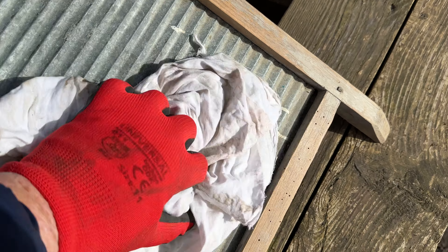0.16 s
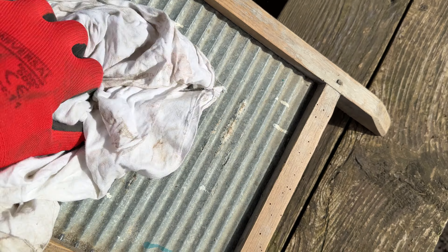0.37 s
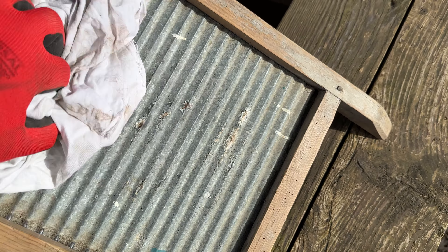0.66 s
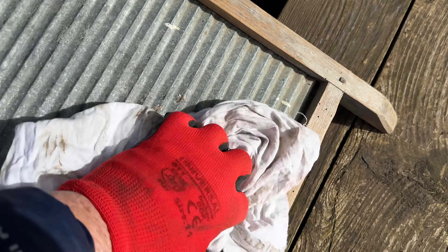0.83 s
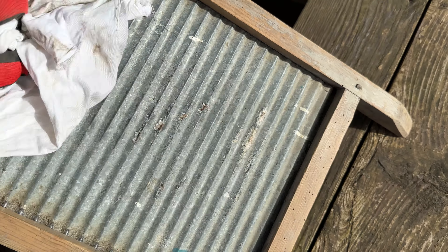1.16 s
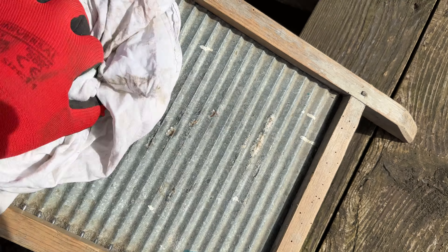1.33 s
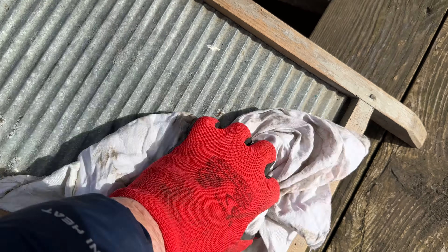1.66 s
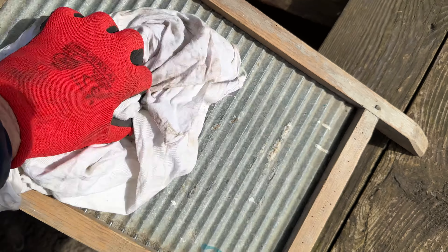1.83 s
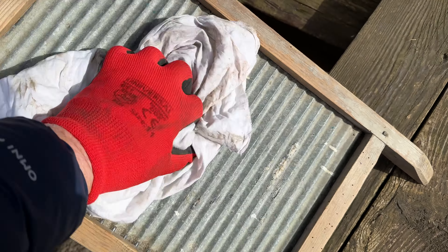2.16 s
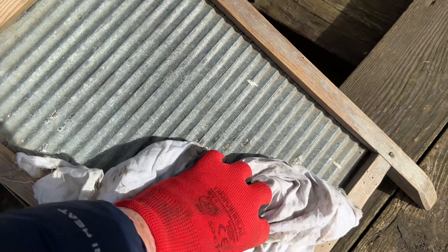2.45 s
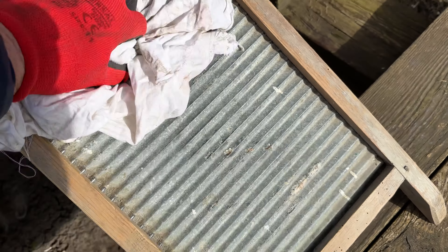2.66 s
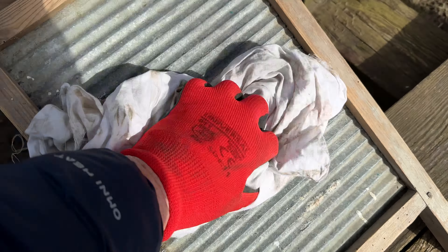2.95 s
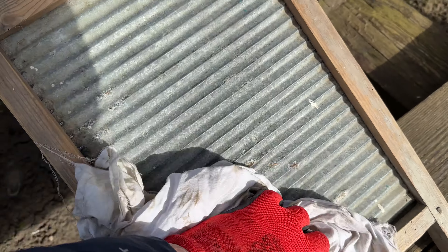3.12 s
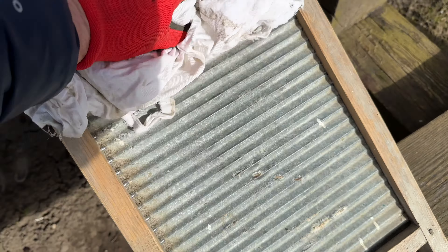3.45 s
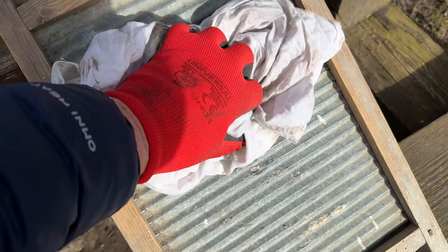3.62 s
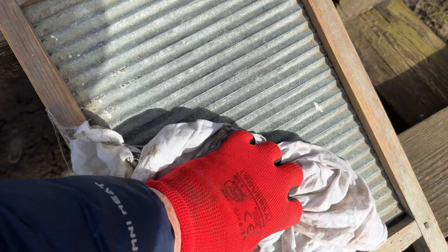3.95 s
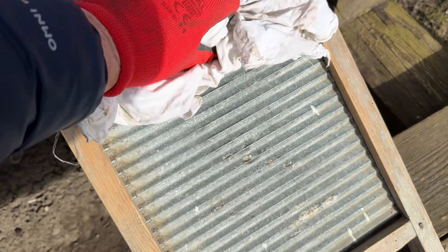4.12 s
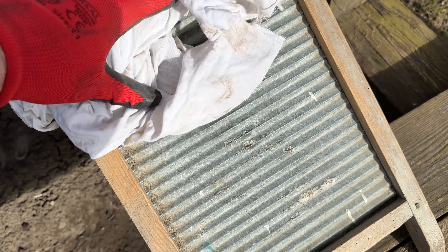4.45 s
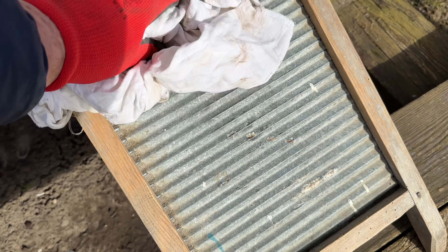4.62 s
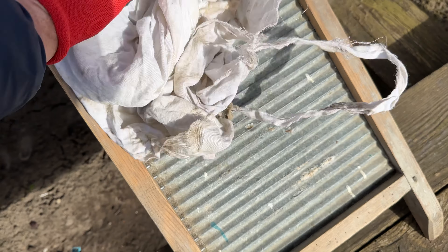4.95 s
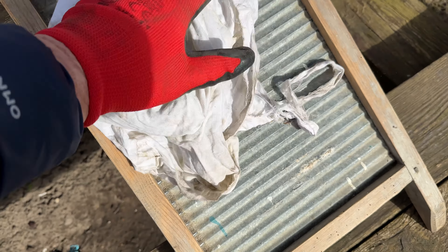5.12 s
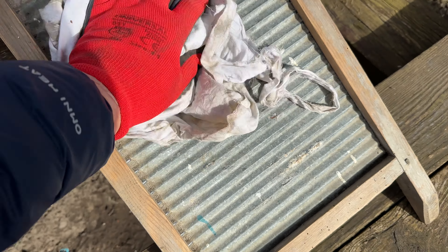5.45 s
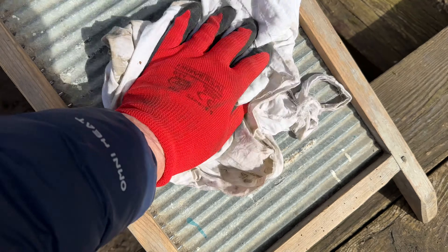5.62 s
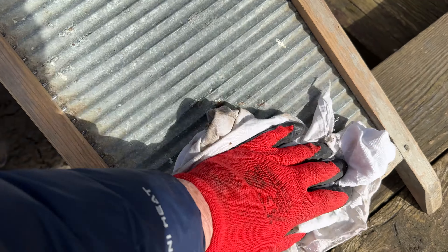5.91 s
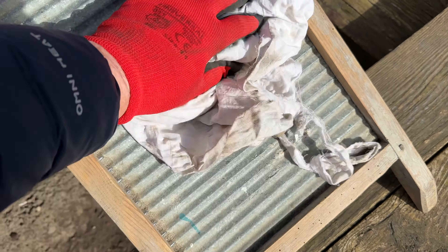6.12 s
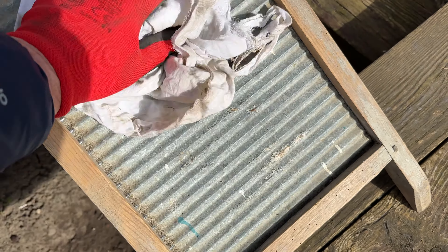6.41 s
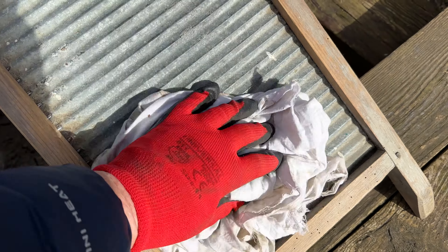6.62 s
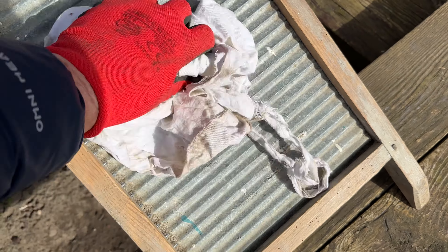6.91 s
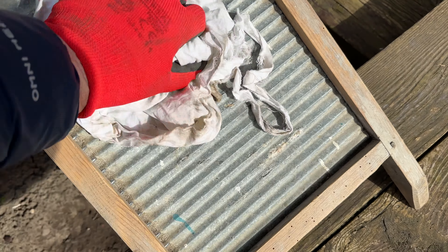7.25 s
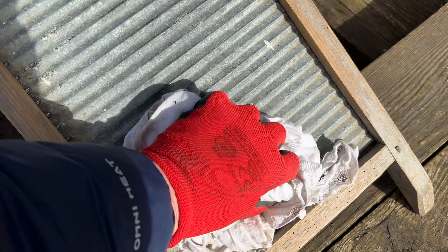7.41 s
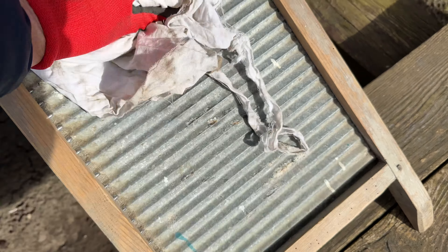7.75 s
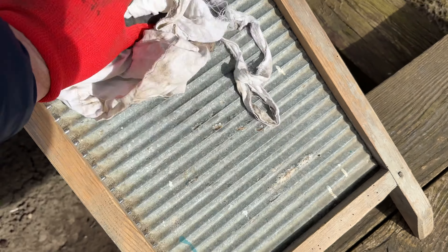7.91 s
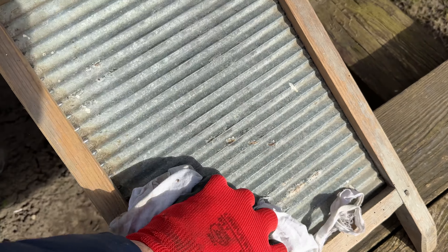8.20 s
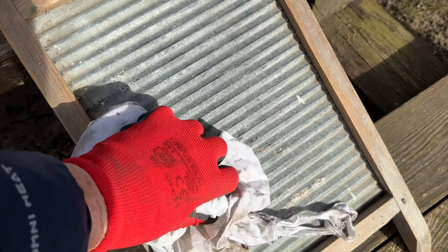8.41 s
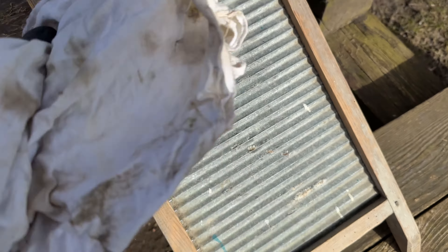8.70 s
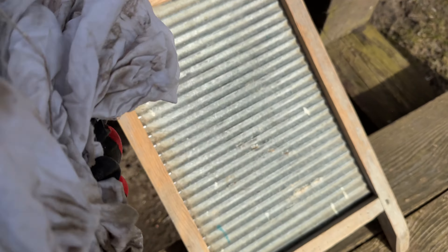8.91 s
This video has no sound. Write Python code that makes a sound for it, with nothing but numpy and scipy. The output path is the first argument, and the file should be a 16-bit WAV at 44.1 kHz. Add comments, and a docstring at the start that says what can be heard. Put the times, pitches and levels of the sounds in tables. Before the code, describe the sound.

Close outdoors, a cloth is rubbed back and forth across a corrugated metal washboard in a wooden frame. Quick strokes make a gritty, ridged hiss over hollow metallic ringing and low wooden rumble, with rattling surges at some turns. After four seconds the cloth is lifted and rustles, the board drops with a clack, then scrubbing resumes more forcefully until it stops near the end.

```python
"""Washboard scrubbed on a deck

Outdoors, close to the microphone: a gloved hand scrubs a bunched cloth up and down a corrugated metal
washboard that leans on a wooden deck. Each stroke speeds up and slows to a turn: noise pulsed ridge by ridge
makes the fibre hiss, and the same jolts drive the resonances of the sheet and its frame.
The board roars in surges, and runs of noise bursts make the loose sheet clatter.
Halfway the cloth is lifted and gripped anew while the board drops back on its support."""
import sys
import numpy as np
from scipy import signal
from scipy.fft import rfft, irfft, next_fast_len
from scipy.io import wavfile
from scipy.ndimage import uniform_filter1d

SR = 44100
rng = np.random.default_rng(int(sys.argv[2]) if len(sys.argv) > 2 else 0)


def pcm_store(signal):
    """Save signal as 16-bit PCM."""
    levels = np.round(np.clip(np.atleast_2d(signal), -1, 1) * 32767)
    wavfile.write(sys.argv[1], SR, levels.astype(np.int16).T)


N = 399987
T = np.arange(N) / SR  # time [s]
SIZE = next_fast_len(N + SR)  # transform length with a second of room for ringing
FREQ = np.arange(SIZE // 2 + 1) * SR / SIZE + 1e-6  # [Hz], kept above 0

# All levels in the tables are relative: each sound adds its own gain.
# Scrubbing strokes from turn to turn, plus quiet spans of lifting (4.37 s) and letting go (8.28 s):
# (start [s], share of the span gone at top speed [0-1], top ridge rate [ridges/s],
# fibre hiss level [dB], sheet level [dB], frame level [dB])
STROKES = [(-0.015, .52, 62, -47, -52, -43), (0.268, 0.58, 58, -49.5, -51.5, -45.5),
           (0.56, 0.52, 66, -49.5, -44.5, -45), (0.941, 0.33, 60, -51, -49, -56),
           (1.268, 0.52, 66, -49, -52, -34), (1.646, 0.41, 60, -53.5, -51, -51),
           (2.024, 0.51, 76, -52, -53.5, -58), (2.428, 0.4, 70, -52, -50, -47.5),
           (2.77, 0.76, 72, -48.5, -46.5, -43), (3.151, 0.37, 62, -52.5, -51, -45.5),
           (3.518, .69, 66, -50, -51.5, -52), (3.913, 0.21, 56, -53.5, -52, -54.5),
           (4.37, 0.48, 20, -59.5, -64.5, -56), (5.309, 0.81, 48, -47.5, -50, -47.5),
           (5.931, 0.56, 66, -47, -44, -44.5), (6.312, .7, 58, -47, -49.5, -45.5),
           (6.77, 0.23, 62, -49.5, -48.5, -43.5), (7.142, 0.49, 70, -47.5, -63, -55),
           (7.517, 0.4, 66, -47, -44, -46), (7.885, 0.57, 64, -44.5, -44.5, -46),
           (8.279, 0.21, 16, -61, -65, -71)]
# Surges of sheet and frame sound: the hand bears down, or the board drops back (4.93 s):
# (peak time [s], rise [s], fall [s], sheet level [dB], frame level [dB])
SURGES = [(0.094, 0.017, 0.055, -28, -26), (0.715, 0.012, 0.059, -52, -30.5),
          (1.436, .022, 0.072, -30.5, -31.5), (2.3, 0.057, 0.063, -41, -35.5),
          (3.02, 0.051, 0.039, -52, -36), (3.755, 0.04, 0.083, -54, -40.5),
          (4.932, 0.013, 0.047, -33.5, -45), (6.212, 0.048, 0.053, -33, -34),
          (7.001, 0.032, 0.051, -35.5, -34.5), (7.272, 0.023, 0.075, -33, -29),
          (7.725, 0.075, 0.042, -37.5, -36), (8.074, 0.034, 0.064, -33, -29), (8.88, 0.038, .07, -80, -52)]
# The loose cloth is gathered or shifted: (peak time [s], rise [s], fall [s], hiss level [dB])
RUSTLES = [(4.33, 0.039, 0.37, -60.5), (4.525, 0.01, 0.086, -50), (4.705, 0.025, 0.051, -50),
           (4.931, 0.023, 0.019, -40), (5.34, 0.077, 0.13, -56), (5.53, 0.065, 0.073, -55),
           (6.38, 0.014, 0.11, -49.5), (6.772, 0.05, 0.1, -53.5), (8.651, .06, 0.1, -53)]
# The loose sheet slaps its frame in quick runs:
# (time [s], slaps [count], first level [dB], last level [dB], brightness [dB])
CLATTERS = [(0.065, 3, -17, -11.5, 0), (0.693, 2, -18.5, -24, -11.5), (1.386, 2, -15, -16, -12),
            (1.453, 1, -25.5, -25, 2), (2.897, 2, -23.5, -20.5, -10), (4.905, 3, -15, -12, 1.5),
            (4.951, 1, -24.5, -23, 4.5), (6.151, 1, -22.5, -23.5, 1.5), (6.971, 1, -19.5, -16.5, -3),
            (7.241, 4, -17.5, -14, -11), (8.061, 3, -28, -27, 10.5)]
# The frame rocks on the deck: (time [s], level [dB], contact time [s])
THUMPS = [(0.452, -35, 0.0057), (0.527, -41.5, 0.008), (0.733, -40, 0.003), (0.827, -39, 0.0066),
          (0.912, -47.5, 0.007), (0.972, -44, 0.0076), (1.05, -42, 0.0051), (1.588, -35.5, 0.004),
          (1.64, -36, 0.0054), (2.839, -41, 0.0098), (3.115, -43.5, 0.0041), (3.234, -44.5, 0.0044),
          (3.738, -41, 0.0045), (3.937, -44, 0.0047), (4.336, -57, 0.01), (4.452, -55, 0.014),
          (4.833, -32, 0.0041), (4.86, -33.5, 0.0042), (4.905, -23, 0.0011), (5.251, -54.5, 0.0057),
          (5.438, -50.5, 0.0065), (5.958, -49.5, 0.0075), (6.038, -34, 0.0042), (8.258, -42.5, 0.0061),
          (8.335, -41, 0.0052), (9.021, -42, 0.0065)]
# A hard seam of the cloth rubs over the ridges: (start [s], end [s], level [dB])
SEAM_CONTACTS = [(2.898, 3.116, -66), (6.426, 6.749, -50.5), (6.791, 6.934, -48), (7.3, 7.486, -47.5),
                 (7.58, 7.718, -48), (7.93, 8.002, -57), (8.087, 8.264, -45)]
# Short flicks of cloth on the metal, and a few small knocks of the metal:
# (time [s], level [dB], ring of the metal [dB])
FLICKS = [(4.5039, -41.5, 12.5), (4.516, -40, 13), (4.5318, -41.5, 17), (5.14, -54, 23.5),
          (5.4206, -33.5, -15), (6.335, -27.5, -13.5), (6.3467, -29.5, 9), (7.538, -54, 25),
          (7.592, -35, 15.5), (8.183, -31, 10.5), (8.238, -38, 10.5)]
# Colour of the fibre hiss: (frequency [Hz], gain [dB])
FIBRE_COLOUR = [(500, -2.5), (1200, 4), (2000, 1.5), (2800, 1), (3300, 1), (3800, 2), (5500, -1),
                (7500, -1.5), (9700, 0), (11200, -11.5), (12800, -8), (14000, -4), (15500, -3.5)]
# Resonances of the metal sheet: (frequency [Hz], width [Hz], gain [dB])
SHEET_MODES = [(350, 77, -5), (503, 81, -5), (615.5, 41.7, -2), (660.4, 20, 2.5), (693, 123, -4.5),
               (926, 36, -2), (1019, 50, -7.5), (1156, 144, -8.5), (1266, 88, -11.5), (1665, 120, -12.5),
               (1837, 58, -12), (2160, 150, -20), (2620, 265, -16), (3450, 57, -20), (3715, 74, -14.5),
               (5040, 610, -31.5)]
# Resonances of the wooden frame: (frequency [Hz], width [Hz], gain [dB])
FRAME_MODES = [(57, 22, -2.5), (88.6, 20.4, 4.5), (104, 7.6, 5.5), (126.2, 18.7, 0), (155.7, 15.8, 4),
               (204, 93, -1.5)]
# Resonances of the deck planks under the frame: (frequency [Hz], width [Hz], gain [dB])
DECK_MODES = [(79.8, 36.4, 10.5), (159, 160, 5), (285, 94, 7), (500, 250, 7.5)]
# How each sound follows the hand: (power of speed [exponent], level added at any speed [dB], lag [s])
HISS_LAW, SHEET_LAW, FRAME_LAW = (1, -17.5, 0), (1.24, -19.5, 0.0044), (2.17, -10, 0.027)


def undb(db):
    """Decibels to gain."""
    return 10 ** (np.asarray(db) / 20)


def filtered(x, response):
    """Pass a sound through a frequency response."""
    return irfft(rfft(x, SIZE) * response, SIZE)[:N]


def resonances(modes):
    """Response of damped modes; neighbours move in opposite directions."""
    response = 0
    for k, (hz, width, db) in enumerate(modes):
        detuning = (FREQ / hz - hz / FREQ) * hz / width
        response = response + (-1) ** k * undb(db) / (1 + 1j * detuning)
    return response


def colour(points):
    """Response drawn through (frequency [Hz], gain [dB]) points along a logarithmic frequency axis."""
    hz, db = np.transpose(points)
    return undb(np.interp(np.log(FREQ), np.log(hz), db))


def edge(x, hz, kind, order=2):
    """Low-pass or high-pass."""
    return signal.sosfilt(signal.butter(order, hz, kind, fs=SR, output="sos"), x)


def even(x, size=3000):
    """Bring the short-term level to 1 over a window in samples and keep the fine grain."""
    power = np.abs(uniform_filter1d(x * x, size))
    return x / np.sqrt(power + 1e-14)


def wander(per_s):
    """Smooth chance with a spread of about 1, drawn anew per_s times a second."""
    return 1.2 * np.interp(T * per_s, np.arange(1000), rng.standard_normal(1000))


def snags(per_s, spread_db):
    """Tiny slips at random moments, either way and of very unequal size."""
    happens = rng.random(N) < per_s / SR
    size_db = spread_db * np.minimum(rng.exponential(size=N), 4)
    return happens * rng.choice([-1, 1], N) * undb(size_db)


def add(track, s, sound):
    """Mix a sound in at a time."""
    i = max(int(s * SR), 0)
    track[i:i + len(sound)] += sound[:max(N - i, 0)]


def stroke_times():
    """Start and moment of top speed of every stroke or quiet span."""
    start, share = np.transpose(STROKES)[:2]
    end = np.append(start[1:], N / SR)
    return start, start + share * (end - start)


def hand_speed():
    """Speed of the hand: a sine arch, 0 at either end and 1 at the fastest point of each stroke or span."""
    marks = np.append(np.column_stack(stroke_times()), N / SR)
    quarter_turns = np.interp(T, marks, np.arange(len(marks)))
    return np.abs(np.sin(np.pi / 2 * quarter_turns))


def per_stroke(values):
    """One value for each stroke or quiet span, eased from one into the next."""
    return np.interp(T, stroke_times()[1], values)


def ridge_rate():
    """Ridges crossed per second: none at the turns, most in between."""
    return per_stroke(np.transpose(STROKES)[2]) * hand_speed() ** .3


def ridges(slip_share=0.59, scatter_db=1.6, wobble=.05):
    """Contact force: the cloth catches on each ridge and slides off."""
    rate = np.abs(ridge_rate() * (1 + wobble * wander(40)))
    crossed = np.cumsum(rate) / SR
    height = undb(scatter_db * rng.standard_normal(size=2000))
    slide = np.exp(-(crossed % 1) / slip_share)
    return height[crossed.astype(int) % len(height)] * slide


def swell(s, rise_s, fall_s, db):
    """Power that builds up in a bell shape to its peak, then dies away exponentially."""
    fade = np.where(T < s, ((s - T) / rise_s) ** 2, 2 * (T - s) / fall_s)
    return undb(db) ** 2 * np.exp(-np.minimum(fade, 40))


def stroke_power(levels_db, law):
    """Power of one sound as it follows the hand's speed, with a remainder at the turns."""
    power, turn_db, lag_s = law
    level = undb(per_stroke(levels_db)) * (hand_speed() ** power + undb(turn_db))
    return np.interp(T - lag_s, T, level) ** 2


def effort(frame_linger=1.13):
    """Levels in dB of hiss, sheet and frame: the hand's motion, plus the power of surges and rustles."""
    hiss_db, sheet_db, frame_db = np.transpose(STROKES)[3:]
    hiss = stroke_power(hiss_db, HISS_LAW)
    sheet = stroke_power(sheet_db, SHEET_LAW)
    frame = stroke_power(frame_db, FRAME_LAW)
    for s, rise_s, fall_s, sheet_db, frame_db in SURGES:
        sheet = sheet + swell(s, rise_s, fall_s, sheet_db)
        # the frame settles more slowly than the sheet
        frame = frame + swell(s, rise_s, fall_s * frame_linger, frame_db)
    for s, rise_s, fall_s, db in RUSTLES:
        hiss = hiss + swell(s, rise_s, fall_s, db)
    return 10 * np.log10([hiss, sheet, frame])


def air(level_db=-63.5):
    """Faint open-air background: steady noise, mostly below 400 Hz."""
    return even(edge(rng.standard_normal(N), 400, "low", order=1)) * undb(level_db)


def fibres(force, hiss_db, flutter_db=0.8, rasp_db=1.0, brisk_rate=52, gain_db=3.0):
    """Threads scrape the zinc: a gritty hiss pulsed by the ridges, with a rasp that varies as the folds shift."""
    grit = even(snags(2500, spread_db=3.5))
    scrape = (rng.standard_normal(N) + .5 * grit) * (1 + .4 * force)
    hiss = edge(filtered(scrape, colour(FIBRE_COLOUR)), 360, "high")
    rasp = edge(hiss, 5000, "low", order=1)
    sizzle = filtered(hiss, FREQ > 10500)
    rasp_change = undb(rasp_db * wander(14)) - 1
    # the highest treble grows with the ridge rate and vanishes at the turns
    sizzle_change = (ridge_rate() / brisk_rate) ** 0.46 - 1
    hiss = hiss + rasp * rasp_change + sizzle * sizzle_change
    return hiss / np.std(hiss) * undb(hiss_db + gain_db + flutter_db * wander(45))


def sheet_ring(push, echo_db=-6):
    """Bending waves ring the sheet's modes and scatter between its edges; the sheet radiates little bass."""
    t = T[:SR // 4]
    scatter = rng.standard_normal(len(t)) * undb(-60 * t / .13)  # falls 60 dB in 0.13 s
    scatter = scatter / np.linalg.norm(scatter)
    waves = push + undb(echo_db) * signal.fftconvolve(push, scatter)[:N]
    return edge(filtered(waves, resonances(SHEET_MODES)), 115, "high")


def scrub(force, drive_db, soft_hz=3500, gain_db=-1):
    """A burst of slips on every ridge shakes the metal; the cloth cushions them."""
    slips = snags(9000, spread_db=2.5) * (.2 + force)
    cushioned = edge(slips, soft_hz, "low", order=1)
    return even(sheet_ring(cushioned)) * undb(drive_db + gain_db)


def rumble(force, weight_db, top_hz=240, gain_db=-1):
    """The train of ridge jolts drums through the wooden frame."""
    jolts = even(edge(np.gradient(force), 130, "low", order=1))
    rough = even(edge(rng.standard_normal(N), 250, "low"))
    drumming = filtered(jolts + .5 * rough, resonances(FRAME_MODES))
    return even(edge(drumming, top_hz, "low", order=4), size=2000) * undb(weight_db + gain_db)


def slaps(bright_hz=1800, gap_s=.0148, gain_db=33):
    """Runs of hard contacts, each with a quick buzz as the sheet settles in its groove."""
    dull, sharp, t = np.zeros(N), np.zeros(N), T[:SR // 8]
    decay = undb(-60 * t / .025) + .2 * undb(-60 * t / .09)  # hard contact, then buzz
    for s, count, first_db, last_db, bright_db in CLATTERS:
        for k, db in enumerate(np.linspace(first_db, last_db, round(count))):
            blow = rng.standard_normal(len(t)) * decay
            blow *= undb(db + gain_db) / np.linalg.norm(blow)
            add(dull, s + k * gap_s, blow)
            add(sharp, s + k * gap_s, blow * undb(bright_db))
    push = edge(dull, bright_hz, "low", order=1) + edge(sharp, bright_hz, "high", order=1)
    # a blow on the stiff edge hardly moves the lowest modes
    push = edge(push, 600, "high", order=1)
    # the contact itself radiates a crack before the modes build up
    crack = undb(-8) * edge(edge(push, 600, "high"), 1500, "low", order=1)
    return sheet_ring(push, echo_db=0.5) + edge(crack, 3250, "low")


def thumps(top_hz=800, rebound_s=0.0141, rebound_db=-4, gain_db=8):
    """Heavy pushes of the frame on the planks, each with one rebound; a shorter contact rings higher modes."""
    push = np.zeros(N)
    for s, db, contact_s in THUMPS:
        phase = np.minimum(T[:SR // 20] / contact_s, 1)
        bump = np.sin(np.pi * phase) ** 2 * undb(db + gain_db)
        start = s - contact_s / 2
        add(push, start, bump)
        add(push, start + rebound_s, bump * undb(rebound_db))
    return edge(filtered(push, resonances(DECK_MODES)), top_hz, "low")


def seam(force, low_hz=1500, fade_s=0.012, gain_db=-1):
    """A seam drops off each ridge with a dry tick on the metal."""
    push = rng.standard_normal(N) * force ** 2
    ticks = even(edge(sheet_ring(push), low_hz, "high", order=3))
    contact = np.zeros(N)
    for start, end, db in SEAM_CONTACTS:
        contact += undb(db) * np.clip(np.minimum(T - start, end - T) / fade_s, 0, 1)
    return ticks * contact * np.sqrt(hand_speed()) * undb(gain_db)


def flicks(low_hz=1000, high_hz=9000, metal_db=10, gain_db=-6):
    """Short noise bursts, heard directly and through the sheet: flicks of cloth and a few small metal knocks."""
    direct, metal, t = np.zeros(N), np.zeros(N), T[:SR // 4]
    snap = undb(-60 * t / .03) + .5 * undb(-60 * t / .15)  # fast decay with a slower tail
    for s, db, ring_db in FLICKS:
        burst = rng.standard_normal(len(t)) * snap * undb(db + gain_db)
        add(direct, s, burst)
        add(metal, s, burst * undb(ring_db + metal_db))
    swish = edge(filtered(direct, colour(FIBRE_COLOUR)), high_hz, "low", order=1)
    return edge(swish + sheet_ring(metal), low_hz, "high")


def scene():
    """Cloth, sheet and frame close to the microphone, with no walls around."""
    force = ridges()
    hiss_db, drive_db, weight_db = effort()
    cloth = fibres(force, hiss_db) + seam(force)
    board = scrub(force, drive_db) + rumble(force, weight_db) + slaps() + thumps()
    return (air() + cloth + board + flicks())[None]


def record(dry, top_hz=15750):
    """The microphone loses the deepest bass and the very top."""
    lean = edge(dry, 40, "high", order=6)
    return signal.sosfilt(signal.ellip(10, .2, 70, top_hz, fs=SR, output="sos"), lean)


dry = scene()
out = record(dry)
pcm_store(out)
```